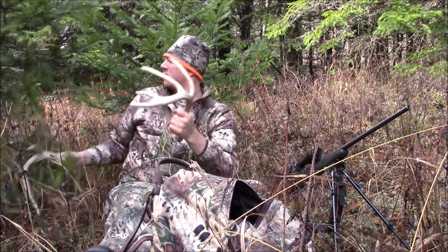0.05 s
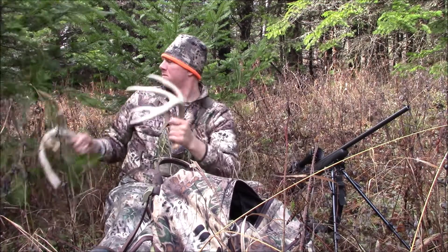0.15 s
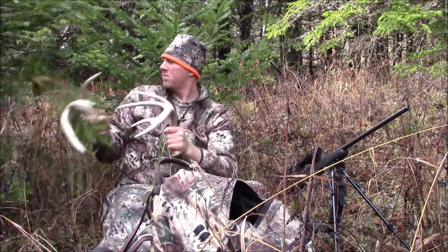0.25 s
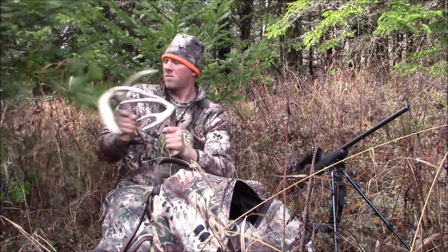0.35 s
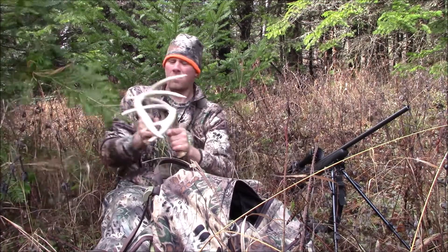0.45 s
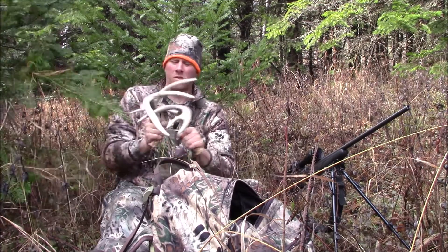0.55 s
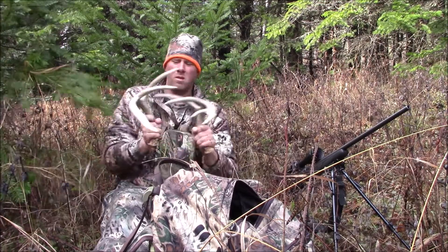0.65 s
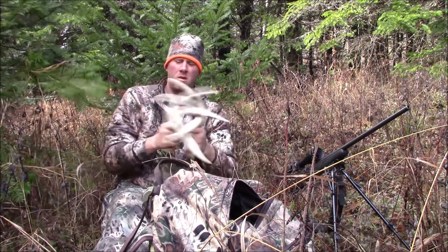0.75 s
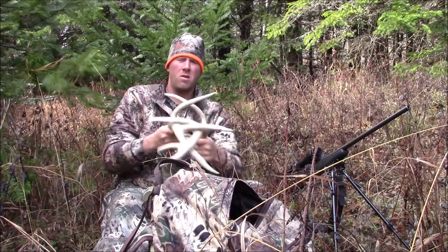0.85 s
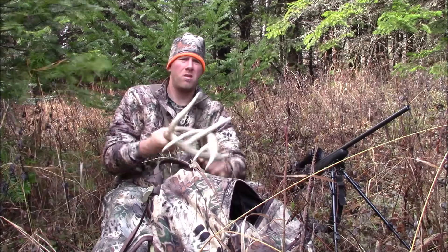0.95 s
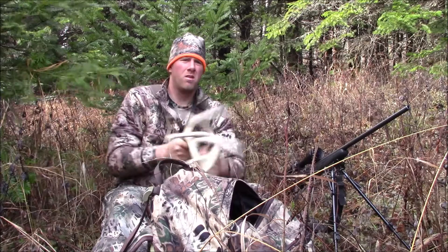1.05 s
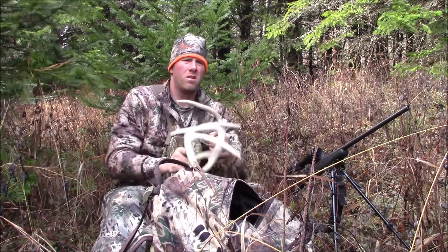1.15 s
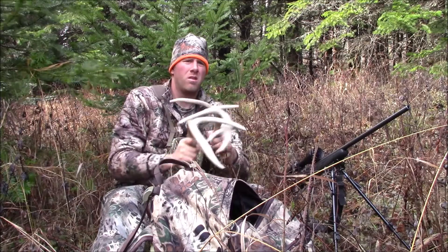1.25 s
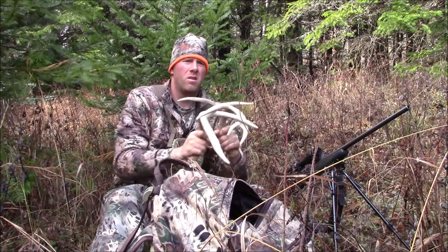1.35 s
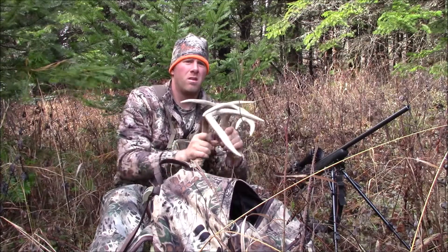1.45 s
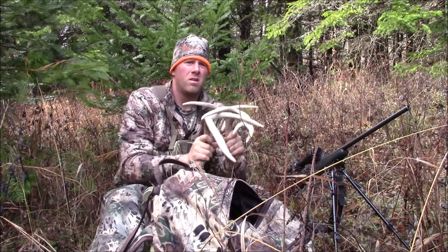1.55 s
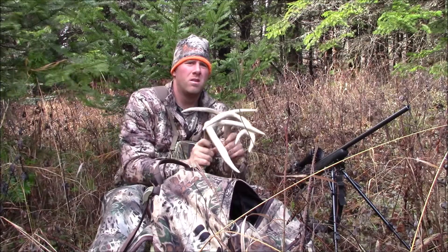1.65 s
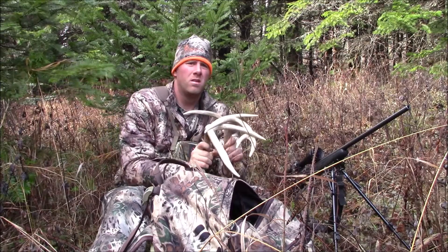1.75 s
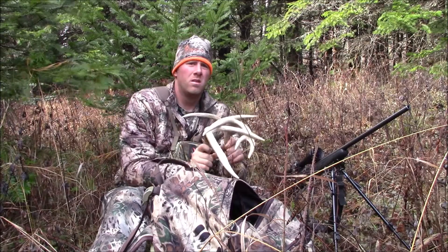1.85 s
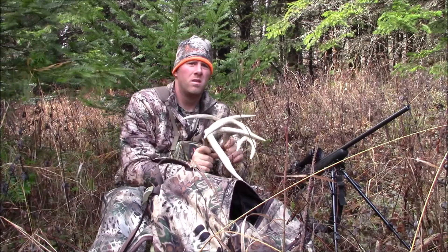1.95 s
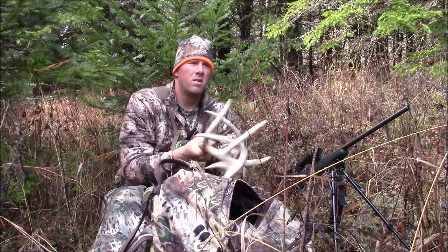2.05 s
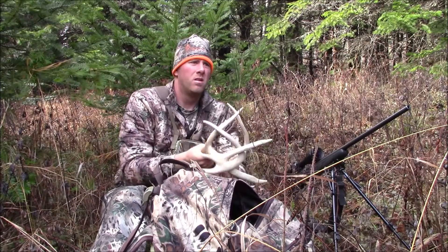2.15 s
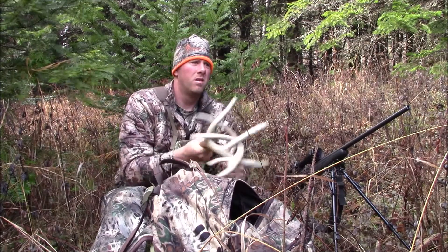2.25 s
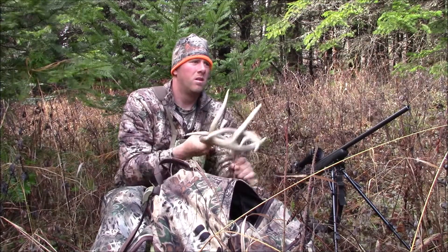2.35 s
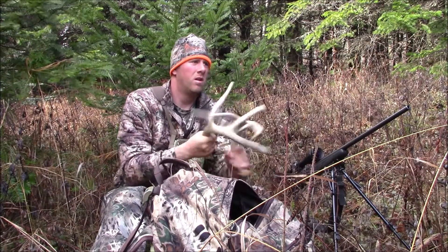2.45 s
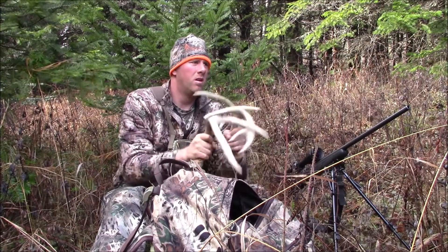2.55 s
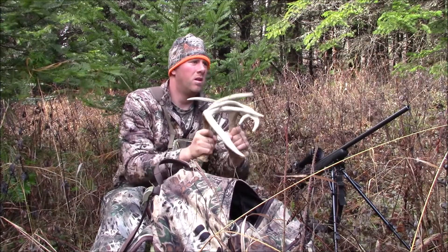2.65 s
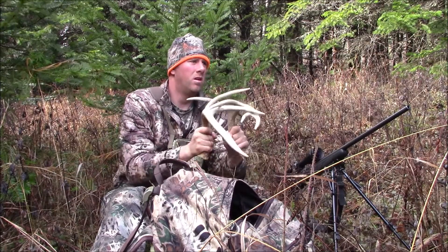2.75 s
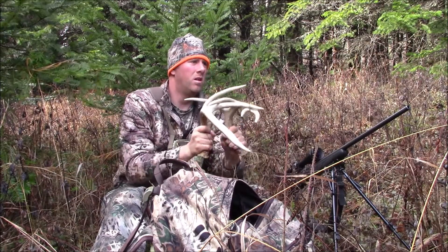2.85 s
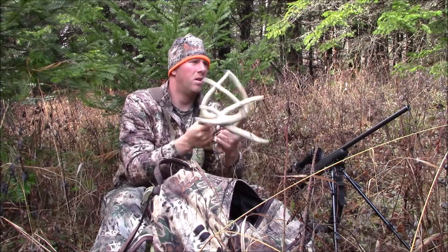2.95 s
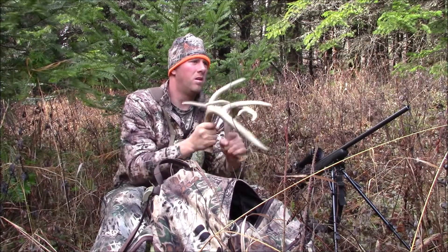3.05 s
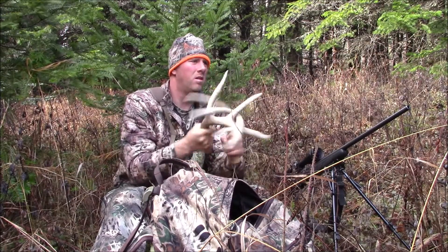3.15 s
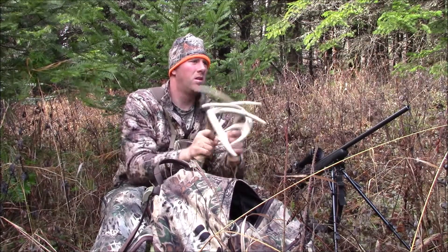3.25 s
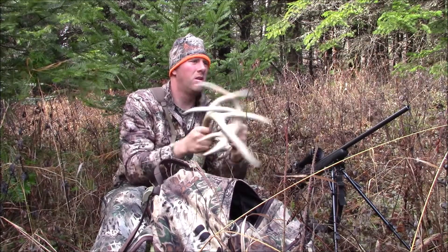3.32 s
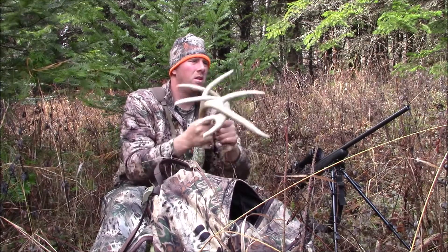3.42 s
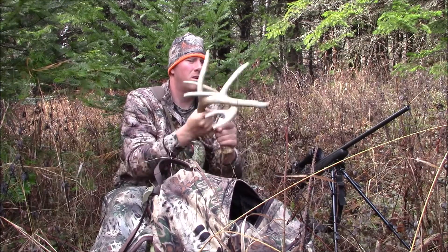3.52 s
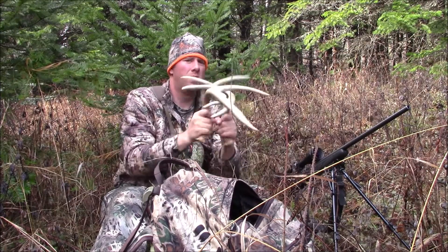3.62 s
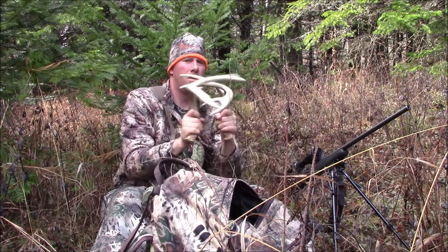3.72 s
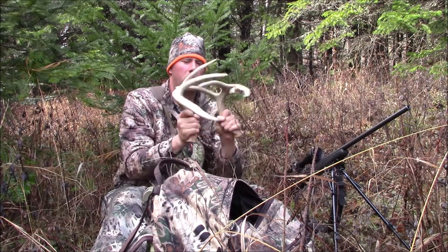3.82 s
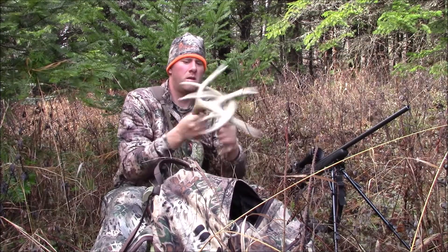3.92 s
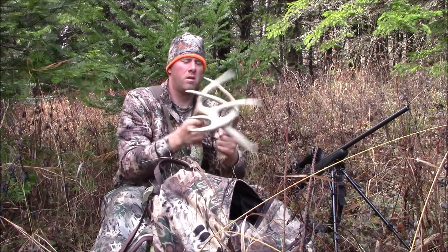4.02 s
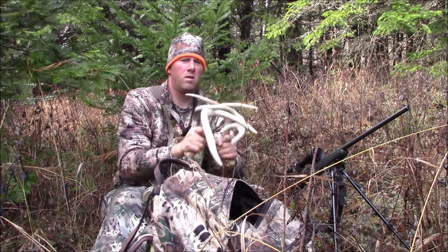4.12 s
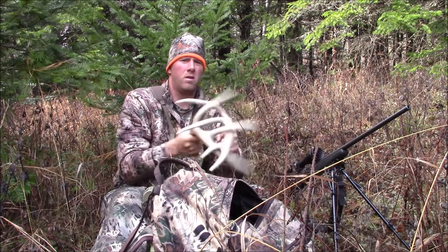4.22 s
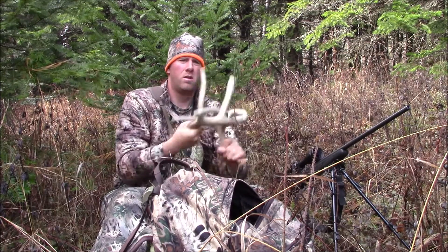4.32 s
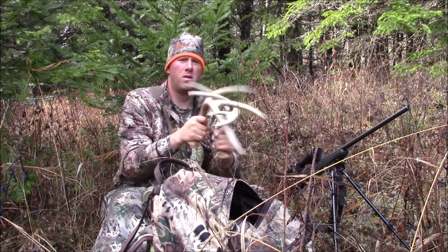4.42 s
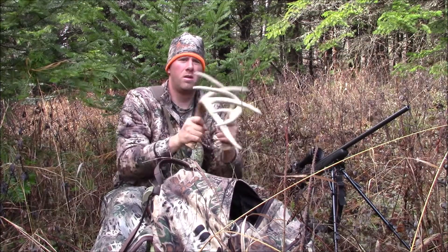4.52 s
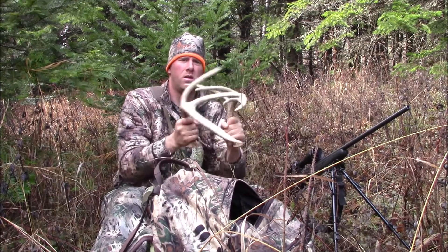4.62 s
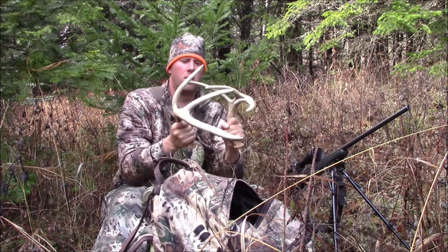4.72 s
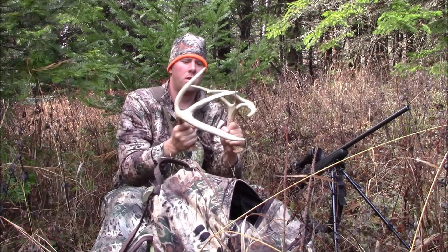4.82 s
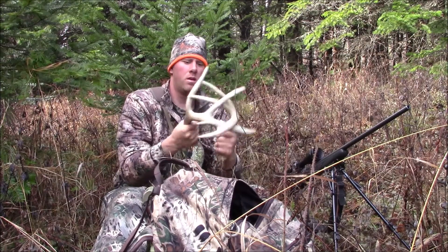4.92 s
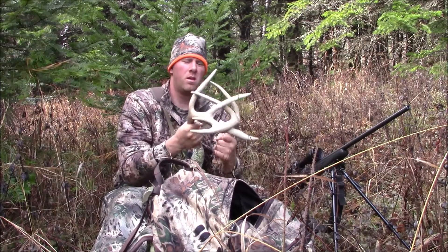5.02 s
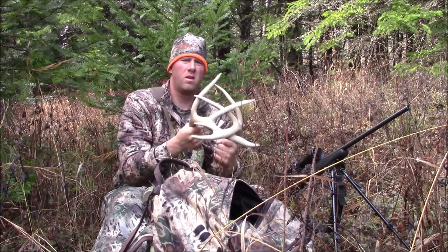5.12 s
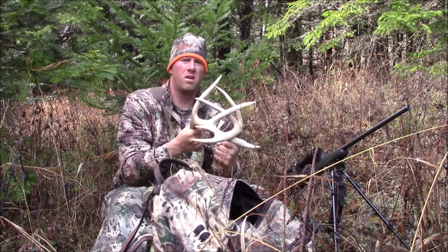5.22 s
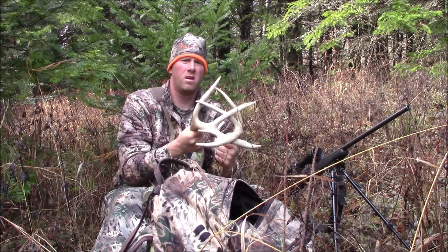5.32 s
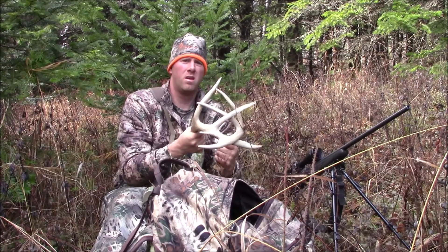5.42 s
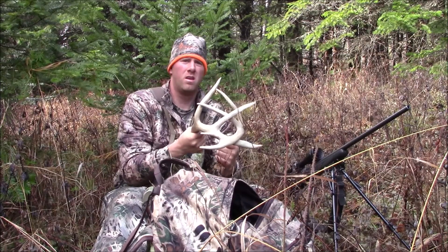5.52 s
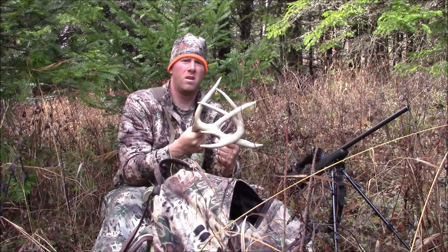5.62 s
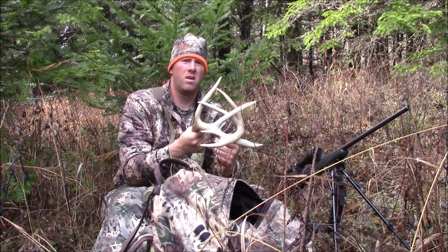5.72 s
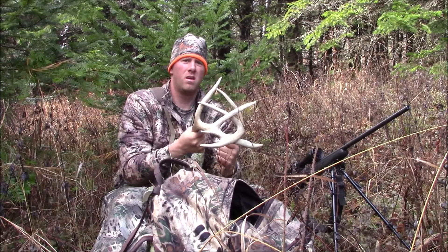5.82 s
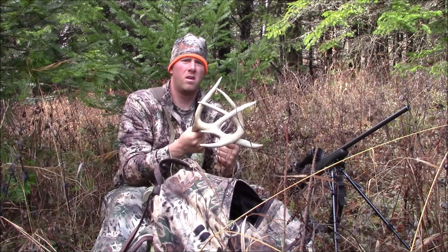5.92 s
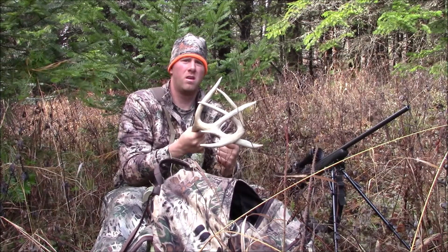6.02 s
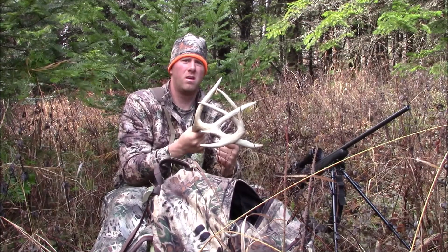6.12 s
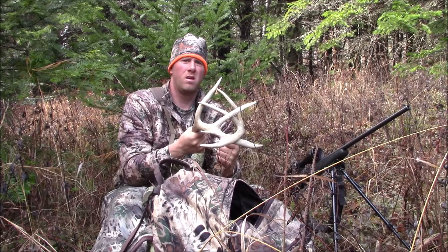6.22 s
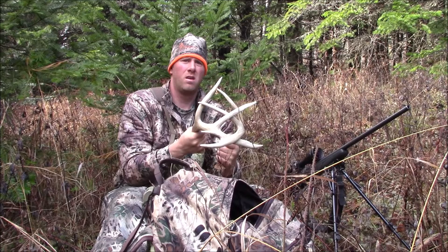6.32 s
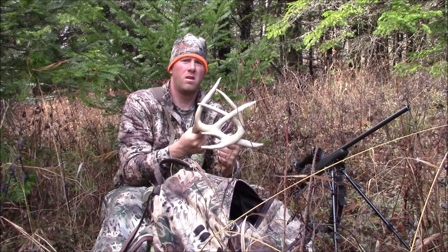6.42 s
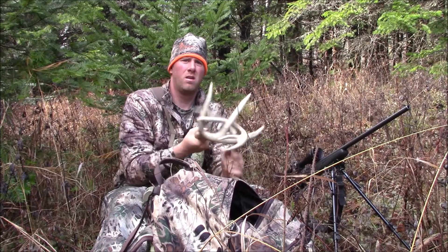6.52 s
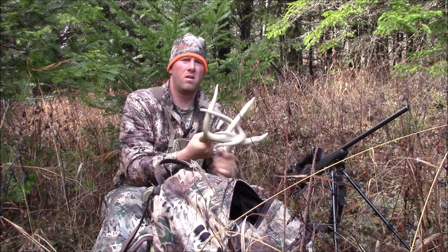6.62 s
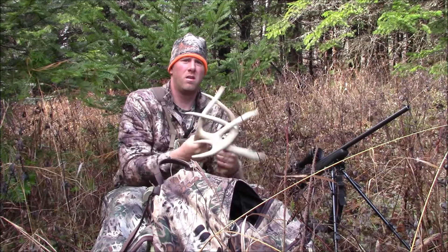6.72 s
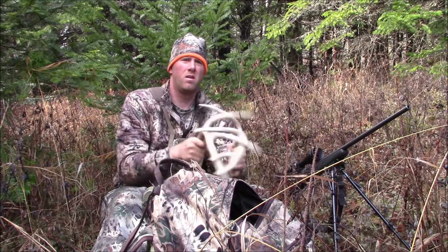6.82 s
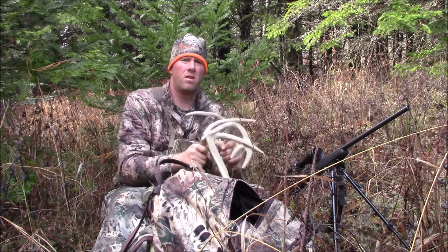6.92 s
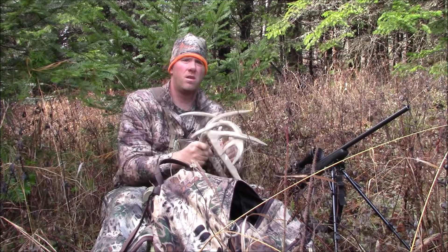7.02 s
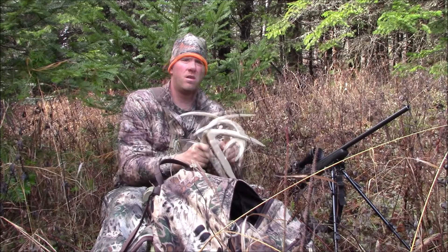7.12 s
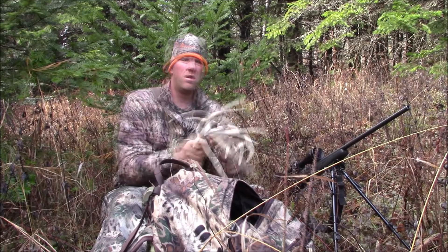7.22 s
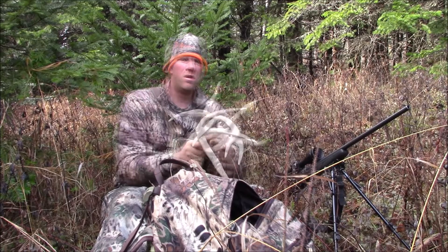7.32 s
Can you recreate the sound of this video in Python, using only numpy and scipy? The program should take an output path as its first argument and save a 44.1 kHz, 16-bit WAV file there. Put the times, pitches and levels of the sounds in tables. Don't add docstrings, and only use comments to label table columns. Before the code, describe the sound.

Deer antlers clash and rattle by hand in uneven bursts, sharp bony clacks and clattering in a brushy forest over faint hiss.

```python
import sys
import numpy as np
from scipy import signal
from scipy.io import wavfile
from scipy.ndimage import uniform_filter1d

SR = 44100
rng = np.random.default_rng(int(sys.argv[2]) if len(sys.argv) > 2 else 0)


def to_wav(s):
    ch = np.atleast_2d(s).T
    pcm = np.round(np.clip(ch, -1, 1) * 32767)
    wavfile.write(sys.argv[1], SR, pcm.astype(np.int16))


def elevation(decibels):
    levels = np.asarray(decibels, float)
    return 10 ** (levels / 20)


N = 324576

# start_s, end_s, level_db
SCRAPES = [
    (0.8, 0.854, -30.5),
    (1.08, 1.117, -31.5),
    (2.304, 2.39, -53),
    (3.494, 3.51, -48),
    (3.572, 3.624, -47.5),
    (3.731, 3.77, -51),
    (4.269, 4.318, -48.5),
    (4.562, 4.594, -57),
    (7.215, 7.259, -43),
    (6.773, 6.795, -48),
]


def antlers():
    out, t = np.zeros((3, N)), np.arange(2200) / SR
    modes = bone_modes(t, count=120)
    for row, chance in zip(contacts(), rng.standard_normal((200, 140))):
        add(out, row[0], clack(row, chance, modes, t))
    for start, end, level_db in SCRAPES:
        length = round((end - start) * SR)
        for chance in rng.standard_normal((3, 140)):
            size = rng.exponential(1, 4000)[:length]
            slipping = rng.random(4000)[:length] < 800 / SR
            slips = elevation(3.7 * size) * slipping * signal.windows.tukey(length, .5)
            grain = clack((0, -22.0, 3057.0, -8.5, 2.5, -14.0), chance, modes, t)
            grind = evened(signal.fftconvolve(slips[None], grain, axes=1))
            add(out, start, elevation(level_db - 8.5) * grind)
    thin_bone = signal.butter(4, 390, "high", fs=SR, output="sos")
    return signal.sosfilt(thin_bone, out)


# start_s, blow_db, tine_hz, beam_db, tips_db
CLASHES = [(.7627, -8.5, 3137, -20, -8), (.6281, -30, 3037, -7.5, -2), (1.0728, -7, 3906, -11.5, -6),
           (1.0952, -10, 2862, -16, -7.5), (2.0428, -11.5, 2068, -3.5, -2),
           (2.0482, -8.5, 4435, -17.5, -11), (2.0633, -10.5, 2930, -16.5, -4.5),
           (2.4983, -4, 3672, -16, -6), (2.5326, -13, 2680, -15, -9), (2.9257, -11.5, 3057, -14.5, -5.5),
           (2.9478, -8, 3905, -21, -6.5), (2.9632, -10, 3632, -13, -4), (3.2335, -12, 2820, -19.5, -15),
           (3.2658, -14, 3280, -11.5, -8.5), (3.3472, -16, 2327, -10, -10),
           (3.9278, -10.5, 4530, -13, -7.5), (3.9426, -11.5, 2738, -25, -8.5),
           (.3906, -19.5, 3030, -13, -1), (4.9278, -6, 5017, -33, -6.5), (4.9308, -9, 3695, -15, -11.5),
           (4.9627, -10.5, 3867, -9, -6.5), (6.8014, -12.5, 3030, -5.5, -7), (6.859, -12, 4745, -12.5, -5)]
# start_s, blow_db, tine_hz, beam_db
KNOCKS = [(3.9485, -16, 3200, -12), (.4135, -20.5, 2740, -16.5), (.8095, -11, 3200, -17.5),
          (.9321, -26.5, 3730, -3), (.9555, -14.5, 2440, -5), (1.0867, -10.5, 2870, -11),
          (1.1133, -16.5, 3044, -11), (1.2956, -23.5, 4570, -11), (2.0702, -16.5, 2790, -11.5),
          (2.318, -26, 3130, 1.5), (2.5527, -18, 2990, -10), (2.5844, -21.5, 2780, -6.5),
          (2.9364, -20, 2820, -8.5), (3.0937, -27.5, 3570, -2.5), (3.1512, -30, 3100, 3),
          (3.1864, -20.5, 4340, -11.5), (3.3182, -19.5, 2620, -12), (3.9359, -10, 3010, -8.5),
          (3.9726, -16, 2120, -8), (4.1643, -21, 3200, -3.5), (4.1752, -17.5, 3880, -13),
          (4.252, -16.5, 2710, -10), (4.3198, -20.5, 2700, -2.5), (4.4507, -18, 4280, -16),
          (4.973, -16.5, 4320, -11), (4.9807, -18, 3200, -9.5), (6.8697, -19, 2650, -11),
          (6.9972, -24, 4610, -15.5), (7.2828, -14.5, 3960, -9), (7.3514, -23, 3170, -2)]
# start_s, blow_db, tine_hz, beam_db
SECONDS = [(0.7641, -12, 3550, -14.5), (0.8107, -14, 4050, -6.5), (1.088, -13.5, 3260, -30),
           (1.0938, -13.5, 2904, -4.5), (2.072, -13.5, 3200, -10), (2.3293, -39.5, 3100, 3),
           (2.5298, -24, 2650, -12), (2.5347, -11.5, 2950, -13.5), (2.578, -31, 2990, -5),
           (2.9275, -16.5, 3020, -3.5), (3.69, -23, 2760, -8), (3.9305, -17.5, 2714, -14.5),
           (3.9442, -12.5, 2740, -14), (3.962, -20, 3200, -7), (4.2843, -24.5, 2655, 2),
           (4.956, -10.5, 3040, -15.5), (4.9358, -15, 3005, -10.5), (6.803, -13, 3015, -11.5),
           (6.819, -24.5, 3260, -9), (6.8442, -33, 2960, -11), (6.886, -22, 3950, -16),
           (6.8892, -17.5, 3960, -9.5), (7.3, -37.5, 2920, -17), (3.0493, -17, 2160, -6.5)]
# start_s, blow_db, tine_hz, beam_db, air_s
BOUNCES = [(0.4729, -32.5, 3040, 2.5, 0.0082), (0.8226, -21.5, 3050, -10, 0.011),
           (0.9848, -20, 2810, -4, 0.0071), (1.1486, -26.5, 4130, -1.5, 0.011),
           (1.3158, -35.5, 3040, -0.5, 0.014), (3.212, -32, 2800, 2, 0.0095),
           (3.3573, -23.5, 3350, -0.5, 0.0037), (3.7264, -32.5, 2870, -14, 0.021),
           (4.061, -20.5, 4030, -8.5, 0.012), (4.2722, -23.5, 4170, -3.5, 0.0089),
           (6.508, -34.5, 2380, 0.5, 0.014), (6.5463, -27.5, 3040, -9.5, 0.0099),
           (6.654, -31, 2890, 2, 0.0077), (7.0475, -38.5, 3350, -21.5, 0.0055),
           (7.1115, -32.5, 2410, -9, 0.0038), (7.292, -24.5, 3000, -8, 0.0066)]
# start_s, blow_db, beam_db
RATTLES = [(.8161, -26, -5), (.9717, -37, 0.5), (1.0004, -28.5, -3), (1.0681, -28.5, -5.5),
           (1.1039, -17, -14), (1.1896, -47, -29), (2.0795, -22.5, -4), (2.601, -33, -3.5),
           (2.9606, -10, -20.5), (3.1737, -29, -9.5), (3.2409, -27, 10.5), (3.2471, -23.5, -23),
           (3.2714, -36, -1), (3.2828, -22.5, -9), (3.3107, -32.5, -8), (3.3338, -26, -2.5),
           (3.9613, -24.5, -2), (4.2038, -24, -18.5), (4.2984, -30, -1.5), (4.3074, -25.5, -3),
           (4.4715, -34.5, -4.5), (4.4844, -28, -6), (4.492, -29.5, -9), (6.8078, -32.5, -8),
           (6.8167, -25.5, -13), (7.2245, -46, 6), (7.2307, -34, -6), (7.2392, -46, -15)]
# start_s, blow_db
TICKS = [(1.168, -52.5), (1.67, -59.5), (2.0004, -55), (2.3107, -39.5), (2.3323, -45), (2.342, -45),
         (2.363, -43), (2.453, -50), (3.497, -49.5), (3.598, -48), (3.731, -33), (3.748, -41.5),
         (4.368, -51), (4.415, -56.5), (4.4287, -41.5), (4.536, -49.5), (4.558, -41.5), (4.5646, -45),
         (4.5736, -46.5), (6.6931, -60), (6.781, -55), (7.2513, -51), (1.65, -62), (1.74, -60)]
# start_s, blow_db, tine_hz, beam_db
CATCHES = [
    (3.218, -37, 2800, 2),
    (3.7045, -32, 3000, -2),
    (3.7293, -31, 3100, -10),
    (3.7545, -39, 3200, -4),
    (3.7615, -43, 3700, -6),
    (4.506, -42, 3500, -2),
    (6.903, -32, 3150, -8),
    (7.2365, -36, 2500, -4),
    (7.244, -38, 2300, -4),
    (7.2525, -41, 1900, -2),
]
BOUNCE_DB, BOUNCE_BEAM_DB, TICK_BEAM_DB = -8.5, -4, -3.5
ANY_TINE_HZ, TINE_SPREAD = 3100, 0.14
BASE_DB, BASE_PER_BEAM, BASE_PER_BLOW = -21, 0.64, -0.23
TIPS_DB, TIPS_PER_BLOW, TIPS_DB_PER_OCTAVE = -11, 0.14, 6


def contacts():
    light = RATTLES + [(s, blow_db, TICK_BEAM_DB) for s, blow_db in TICKS]
    light += [(s + air_s, blow_db + BOUNCE_DB, BOUNCE_BEAM_DB) for s, blow_db, _, _, air_s in BOUNCES]
    any_tines = ANY_TINE_HZ * np.exp(TINE_SPREAD * rng.standard_normal(100))
    rows = KNOCKS + SECONDS + [row[:4] for row in BOUNCES]
    rows += [(s, blow_db, tine_hz, beam_db) for (s, blow_db, beam_db), tine_hz in zip(light, any_tines)]
    rows += CATCHES
    with_tips = list(CLASHES)
    for s, blow_db, tine_hz, beam_db in rows:
        octaves = np.log2(tine_hz / ANY_TINE_HZ)
        tips_db = TIPS_DB + TIPS_PER_BLOW * blow_db + TIPS_DB_PER_OCTAVE * octaves
        with_tips.append((s, blow_db, tine_hz, beam_db, tips_db))
    return [(s, blow_db, tine_hz, BASE_DB + BASE_PER_BEAM * beam_db + BASE_PER_BLOW * blow_db, beam_db, tips_db)
            for s, blow_db, tine_hz, beam_db, tips_db in with_tips]


# edge_hz (base below 1000, beam to 2200, tines to 6000, tips above)
EDGES = [0, 1000, 1350, 1750, 2200, 2700, 3300, 4000, 4900, 6000, 7300, 9000, 11000, 22000]


def clack(row, chance, modes, t):
    s, blow_db, tine_hz, base_db, beam_db, tips_db = row
    hz, shapes = modes
    drive = np.sign(chance[:len(hz)]) * abs(chance[:len(hz)]) ** .5
    free = driven(s, hz)
    struck_tine = ring(np.array([tine_hz]), np.array([.022]), t)[0]
    sound = 1.97 * driven(s, tine_hz) * struck_tine
    cuts = np.searchsorted(hz, EDGES)
    power = (shapes[:, :300] ** 2).mean(1)
    zone = np.searchsorted([1000, 2200, 6000], hz, side="right")
    zone_db = [base_db, beam_db, -3.0, tips_db]
    for lo, hi in zip(cuts, cuts[1:]):
        undamped = drive[lo:hi] @ shapes[lo:hi]
        band = (drive * free)[lo:hi] @ shapes[lo:hi]
        share = power[lo:hi].sum() / power[zone == zone[lo]].sum()
        sound += elevation(zone_db[zone[lo]]) * band * np.sqrt(share / np.mean(undamped[:300] ** 2))
    touch_s = .000055 * elevation(-.5 * blow_db)
    sound *= 1 - np.exp(-t / touch_s)
    sound *= 1 + .45 * elevation(-60 * t / .001)
    spread = sound * elevation(-60 * t / .002)
    chatter = np.zeros(128)
    rebounds = (abs(chance[-4:]) * 45).astype(int) % 128
    chatter[rebounds] = .18 * chance[-8:-4]
    chatter[0] = 1
    front = np.convolve(sound, chatter / np.linalg.norm(chatter))[:len(t)]
    facing = chance[:12] / np.linalg.norm(chance[:12])
    askew = np.convolve(np.gradient(front), facing)[:len(t)]
    spread = spread * np.linalg.norm(front) / np.linalg.norm(spread)
    return elevation(blow_db) * np.array([front, spread, askew])


# start_s, mode_hz
SILENT = [(0.3906, 9270), (0.3906, 2994), (0.3906, 6075), (0.4722, 4340), (0.9555, 3816), (1.0728, 7160),
          (1.0728, 3790), (1.0867, 3260), (1.0952, 7620), (1.1486, 1640), (1.1486, 4320), (2.0428, 6910),
          (2.0428, 6360), (2.0633, 2922), (2.0702, 3050), (2.4983, 2980), (2.4983, 6337), (2.9257, 4620),
          (2.9257, 5890), (2.9478, 3840), (2.9632, 6054), (3.1512, 3860), (3.1864, 4320), (3.2658, 2620),
          (3.9278, 3818), (3.9278, 2705), (3.9426, 4206), (3.9426, 5950), (3.9726, 2080), (4.1752, 3410),
          (4.1752, 2275), (4.2038, 3460), (4.2038, 4580), (4.2722, 1420), (4.4507, 4180), (4.4715, 3800),
          (4.492, 2884), (4.9278, 3197), (4.9278, 5150), (4.9278, 2286), (4.9308, 3870), (4.9627, 1807),
          (4.9627, 4680), (4.9627, 3850), (6.8014, 4970), (6.8014, 1060), (6.9972, 5860), (6.9972, 2590),
          (7.1106, 5430), (7.3514, 4220)]
# start_s, mode_hz, level_db
STRONG = [(0.3906, 5900, -28.5), (0.7627, 3810, -12.5), (0.8095, 3170, -6.5), (0.9555, 2720, -14.5),
          (0.9555, 2060, -21.5), (1.0867, 2860, -10), (1.0867, 8010, -24), (1.0867, 6810, -19),
          (1.0952, 5970, -18), (1.1133, 4894, -17), (2.0428, 2070, -7), (2.0428, 7370, -12.5),
          (2.0482, 3770, -15.5), (2.0482, 9070, -19.5), (2.0482, 5070, -12), (2.0633, 8050, -22),
          (2.0633, 5100, -14.5), (2.318, 2370, -23), (2.318, 3310, -18), (2.318, 1014, -24.5),
          (2.4983, 8700, -18.5), (2.4983, 7240, -24.5), (2.5326, 6060, -23), (2.5326, 2940, -4.5),
          (2.9478, 5100, -13.5), (2.9632, 3820, -17), (3.9278, 2440, -14.5), (3.9278, 3160, -8.5),
          (3.9278, 4200, -15), (3.9278, 2060, -16), (3.9426, 1690, -17), (4.1752, 9360, -20),
          (4.2722, 1900, -21), (4.4507, 3435, -17), (4.4715, 3320, -23.5), (4.9308, 5360, -4.5),
          (4.956, 3050, -10.5), (4.9627, 3055, -15), (4.973, 7830, -13), (4.973, 7420, -22),
          (4.973, 3550, -23), (4.973, 4410, -37), (6.8014, 2380, -12), (6.8014, 3116, -5),
          (6.859, 6070, -11), (6.9972, 8470, -22.5), (7.2828, 4340, -13.5), (7.3514, 3080, -15.5)]
DIP_WIDTH_HZ = 160


def driven(s, hz):
    still = [row[1] for row in SILENT + STRONG if -.0012 < s - row[0] < .0025]
    dips = [1 - np.exp(-((hz - still_hz) / DIP_WIDTH_HZ) ** 2) for still_hz in still]
    return np.prod(dips + [np.ones_like(hz)], axis=0)


# mode_hz, t60_s
BASE = [(590, 0.016), (650, 0.015)]
# mode_hz, t60_s
BEAM = [(1310, 0.025), (1430, 0.028), (1720, 0.024)]
# mode_hz, t60_s
TINES = [(2800, .024), (3050, .03), (3830, .024), (4430, .02)]
# mode_hz, level_db, t60_s
CROWD = [(327, -3.5, 0.0024), (460.8, -20, .009), (620, -5, 0.058), (1070, -14.5, 0.069),
         (1520, -10.5, 0.052), (3200, 7.5, 0.022), (5670, 1.5, 0.016), (8150, -4, 0.012), (8850, -6, 0.013),
         (11515, -20, 0.0047), (15405, -31, 0.0054)]


def bone_modes(t, count):
    hz = 330 + 15000 * ((np.arange(count) + rng.random(count)) / count) ** 1.7
    t60 = read(CROWD, hz, axis=2) * np.exp(0.14 * rng.standard_normal(count))
    short = elevation(read(CROWD, hz))[:, None] * ring(hz, t60, t)
    fixed_hz, fixed_t60 = np.transpose(BASE + BEAM + TINES)
    fixed = elevation(4.0) * ring(fixed_hz, fixed_t60, t)
    hz = np.r_[hz, fixed_hz]
    rising = np.argsort(hz)
    return hz[rising], np.r_[short, fixed][rising]


def ring(hz, t60, t):
    return elevation(-60 * t / t60[:, None]) * np.sin(2 * np.pi * hz[:, None] * t)


# start_s, pitch_hz, level_db
ANSWERS = [(.3906, 3860, -24), (.3906, 2110, -24.5), (.4135, 3570, -23), (.7627, 5420, -4.5),
           (.7646, 6340, -14), (.8095, 1623, -15.5), (.8095, 1940, -10.5), (.9555, 2756, -14.5),
           (.9555, 1375, -19), (1.0728, 3030, -8.5), (1.0952, 4400, -13), (1.0952, 5106, -3),
           (1.2956, 2960, -22.5), (1.2956, 3700, -18), (2.0428, 4320, -13.5), (2.0428, 5200, -7),
           (2.0428, 7340, -12), (2.0482, 3010, -9.5), (2.0633, 5330, -10.5), (2.0633, 7700, -9.5),
           (2.318, 3630, -17.5), (2.318, 4100, -18.5), (2.4983, 5000, -14), (2.4983, 6900, -3.5),
           (2.5527, 2325, -25), (2.5844, 4970, -19), (2.9257, 3920, -4), (2.9257, 1600, -40),
           (2.9478, 2940, -16.5), (2.9478, 5180, -6.5), (2.9632, 3970, -4), (2.9632, 5700, -9),
           (3.0489, 2842, -19.5), (3.0489, 3660, -17), (3.0937, 3550, -27), (3.1864, 1820, -20.5),
           (3.1864, 2700, -18.5), (3.2335, 3692, -6), (3.2658, 3670, -9), (3.2658, 6160, -16.5),
           (3.2828, 3700, -22), (3.3472, 2880, -11), (3.3472, 4530, -11.5), (3.6901, 2250, -22),
           (3.9278, 2120, -15), (3.9426, 3822, -8), (3.9426, 7480, -6.5), (4.061, 4040, -18),
           (4.1643, 2750, -24), (4.1752, 6800, -23), (4.2722, 2760, -24.5), (4.4507, 3670, -13.5),
           (4.4507, 3020, -13.5), (4.4709, 3980, -22.5), (4.956, 3940, -11), (4.9627, 3100, -9.5),
           (4.973, 3200, -12), (6.8014, 3950, -9), (6.859, 3740, -6), (7.2828, 3030, -15)]
# start_s, pitch_hz, level_db, t60_s
FREE = [(.3910, 701, -35.5, 0.075), (0.472, 1698, -43, 0.11), (0.631, 1730, -43, 0.11),
        (.7650, 595, -21, 0.047), (1.0750, 630.4, -19, 0.076), (1.077, 1498, -11.5, 0.086),
        (1.1000, 3050, -36, 0.43), (1.1010, 1416, -42, .2), (2.0435, 1995, -11.5, 0.034),
        (2.535, 3200, -14, .04), (3.0945, 638, -36.5, 0.06), (3.1880, 2100, -28.5, 0.047),
        (3.953, 3040, -39, .15), (4.063, 2385, -16, 0.026), (4.166, 1397, -20, 0.062),
        (4.1755, 12330, -25, 0.0095), (4.286, 1277, -32, 0.054), (4.2900, 610, -37, 0.11),
        (4.319, 1171, -9.5, 0.019), (4.451, 1500, -21.5, 0.067), (4.932, 3025, -14, 0.038),
        (6.552, 3100, -51, 0.11), (6.655, 3235, -57.5, 0.62), (6.8034, 2940, -11, 0.023),
        (6.807, 1490, -18, 0.072), (6.808, 3100, -39, 0.3), (6.89, 3833, -37, 0.3),
        (7.1130, 613, -45, 0.12), (1.15, 3031, -43, .24), (6.89, 4690, -48, .3), (2.32, 1104, -31, .046),
        (3.75, 1600, -45, .1), ]
ANSWER_T60_S = 0.032


def free_tines():
    out, t = np.zeros((1, N)), np.arange(15000) / SR
    brief = t[:2000]
    for s, hz, level_db in ANSWERS + STRONG:
        t60 = ANSWER_T60_S * (3000 / hz) ** .5
        answer = ring(np.array([hz]), np.array([t60]), brief)
        add(out, s, elevation(level_db) * answer * np.minimum(brief / 0.00047, 1))
    for s, hz, level_db, t60 in FREE:
        add(out, s, elevation(level_db) * ring(np.array([hz]), np.array([t60]), t) * np.minimum(t / 0.0012, 1) ** 2)
    return out[0]


# band_hz, level_db, t60_s
TREES = [(300, -11.5, .37), (800, -8, 1), (1500, -2, 0.91), (2800, -1, 0.72), (4000, -5, 1),
         (5300, 1.5, 0.5), (9060, 0.5, 0.25), (14000, -10.5, .2)]
# band_hz, likeness (-1 to 1)
TREES_SAME = [(60, -0.12), (240, -0.22), (950, 0.43), (3770, 1), (15000, 0.34)]


def forest(front, spread):
    def field_db(hz, t):
        build_up_db = 20 * np.log10(np.clip(t / .05, 1e-3, 1))
        return read(TREES, hz) - 60 * t / read(TREES, hz, axis=2) + build_up_db

    trunks = noise(SR, TREES_SAME, field_db, .7)
    t = np.arange(4000) / SR
    brush = rng.standard_normal((2, 4000)) * elevation(-60 * t / 0.12) * (t > .0015)
    brush[1] = .9 * brush[0] + .25 * brush[1]
    far = signal.fftconvolve(spread[None], trunks / np.linalg.norm(trunks[0]), axes=1)[:, :N]
    dulled = signal.lfilter([.45], [1, -.55], .5 * front + 1.1 * spread)
    near = signal.oaconvolve(dulled[None], brush / np.linalg.norm(brush[0]), axes=1)[:, :N]
    return elevation(-29.5) * far + elevation(-15.5) * near


# time_s, level_db
SWISH = [(0, -48.5), (.09, -52.5), (.17, -49), (.25, -53.5), (.36, -56), (.6, -69), (0.749, -67.5),
         (1.6, -73), (1.952, -73.5), (2.9, -73), (3.85, -77.5), (4.7, -77.5), (5.6, -82.5), (6.4, -93.5),
         (6.6, -67.5), (7.36, -73.5)]
# band_hz, density_db (per Hz)
LEAVES = [(120, -64.5), (200, -20), (596, -4), (992, -4.5), (1130, -4.5), (2130, -2.5), (3180, 2),
          (4660, -2.5), (8200, 3), (15500, -17.5)]
# band_hz, likeness (-1 to 1)
LEAVES_SAME = [(60, -0.33), (240, 0.17), (950, 1), (3770, 0.73), (15000, 0.79)]


def branch():
    s, level_db = np.transpose(SWISH)
    rustle = evened(noise(N, LEAVES_SAME, lambda hz, t: read(LEAVES, hz) + 0 * t, 0.73))
    return rustle * elevation(np.interp(np.arange(N) / SR, s, level_db))


# start_s, length_s, pitch_hz, level_db
CHIRPS = [
    (4.68, .08, 5560, -71),
    (5.68, .1, 5560, -74),
    (6.34, .1, 5560, -73),
]


def bird():
    out = np.zeros((1, N))
    for s, length, hz, level_db in CHIRPS:
        t = np.arange(round(length * SR)) / SR
        add(out, s, elevation(level_db) * np.sin(2 * np.pi * hz * t)[None] * np.hanning(len(t)))
    return out


# band_hz, density_db (per Hz)
HISS = [(45, -6), (170, -8), (400, -4), (900, 0), (1300, -2), (2000, -6), (3500, -8), (6000, -13),
        (9000, -19), (12000, -26), (15000, -38)]
# band_hz, likeness (-1 to 1)
HISS_SAME = [(60, -0.2), (240, -0.29), (950, -0.49), (3770, -0.2), (15000, 0.22)]
HISS_DB = -62.5


def hiss():
    return elevation(HISS_DB) * evened(noise(N, HISS_SAME, lambda hz, t: read(HISS, hz) + 0 * t, 0.86))


def noise(length, same, field_db, patchy_db):
    frames, hz = length // 128 + 5, np.fft.rfftfreq(512, 1 / SR)
    a, b, c, d, patches = rng.standard_normal((frames, 257, 5)).T
    patches = uniform_filter1d(patches, size=6, axis=0)
    patches = evened(uniform_filter1d(patches, size=16, axis=1))
    alike = np.clip(read(same, hz), -1, 1)[:, None]
    left, other = a + 1j * b, c + 1j * d
    z = np.array([left, alike * left + np.sqrt(1 - alike ** 2) * other])
    z *= elevation(field_db(hz[:, None], np.arange(frames) * 128 / SR) + patchy_db * patches)
    return signal.istft(z, nperseg=512, noverlap=384)[1][:, :length]


def evened(x):
    return x / np.sqrt(np.mean(x ** 2) + 1e-20)


def read(points, hz, axis=1):
    table = np.transpose(points)
    return np.interp(np.log(hz + 1), np.log(table[0] + 1), table[axis])


def add(mix, s, sound):
    part = mix[:, round(s * SR):][:, :sound.shape[1]]
    part += sound[:, :part.shape[1]]


def scene():
    bone, spread, askew = antlers()
    tines = free_tines()
    bone, spread = bone + tines, spread + .33 * tines
    body = rng.standard_normal(600) * elevation(-60 * np.arange(600) / 500)
    slant = 0.049 * signal.oaconvolve(bone, body / np.linalg.norm(body))[:N]
    slant = slant + 0.088 * np.gradient(bone) + 0.083 * askew + .08 * np.gradient(askew)
    near = np.array([elevation(-1.0) * bone + slant, elevation(-1.9) * bone - slant])
    return near + forest(bone, spread) + branch() + bird() + hiss()


def band_limit(x):
    return signal.sosfilt(signal.butter(12, 16330, fs=SR, output="sos"), x)


def record(dry):
    ceiling, knee = np.where(dry > 0, 1.005, [[.985], [.975]]), 5.0
    limited = dry / (1 + abs(dry / ceiling) ** knee) ** (1 / knee)
    thump = signal.lfilter(*signal.butter(2, 260, fs=SR), limited - dry)
    limited = limited - 0.17 * thump
    limited = signal.oaconvolve(limited, signal.firwin(127, 15900, fs=SR)[None], "same")
    return band_limit(limited)


dry = scene()
out = record(dry)
to_wav(out)
```